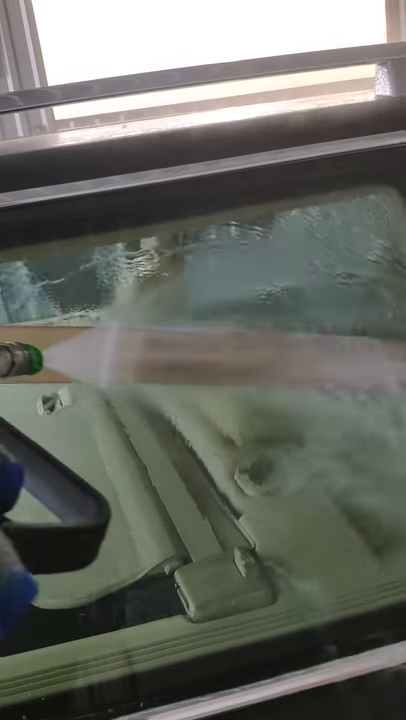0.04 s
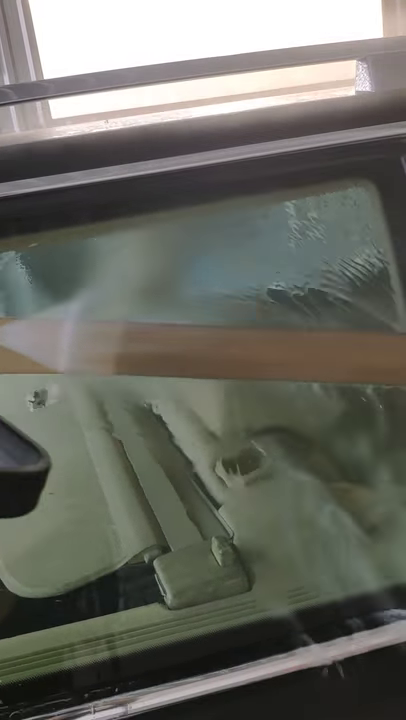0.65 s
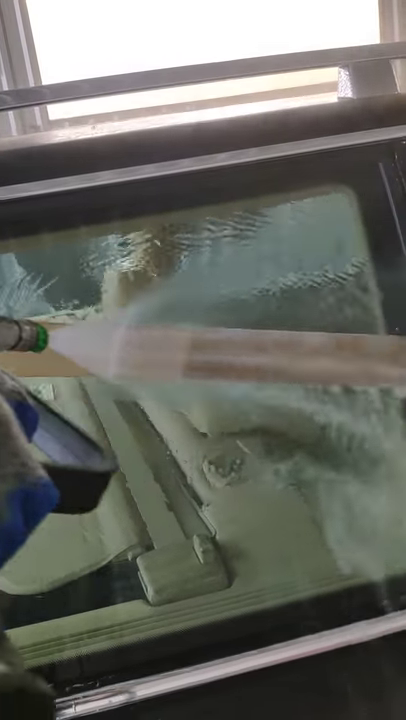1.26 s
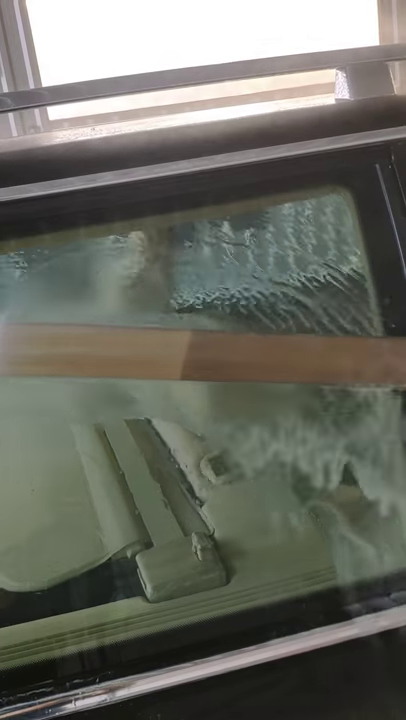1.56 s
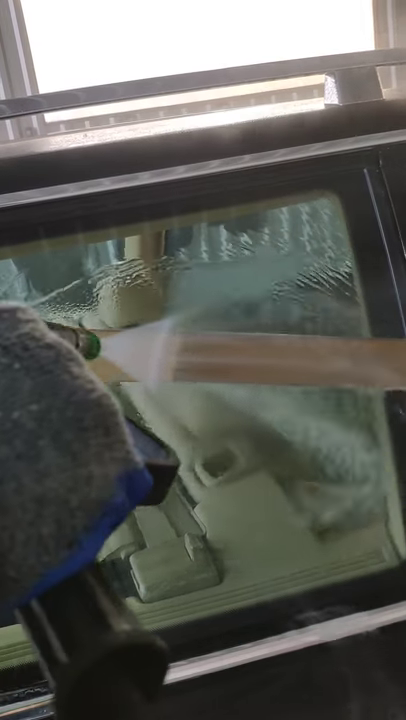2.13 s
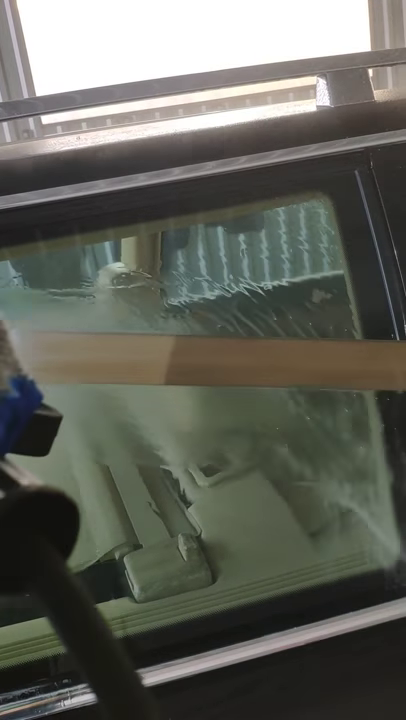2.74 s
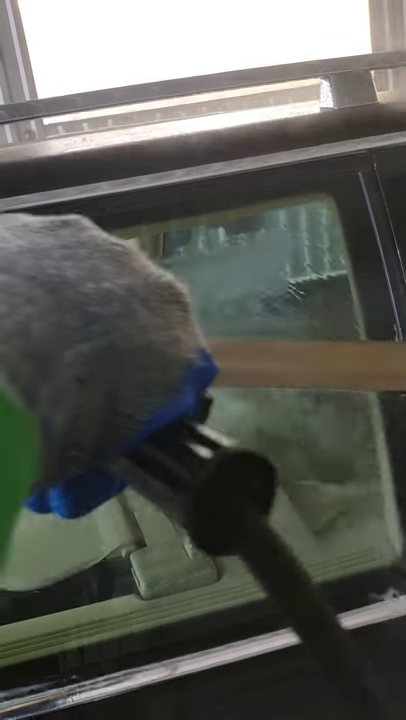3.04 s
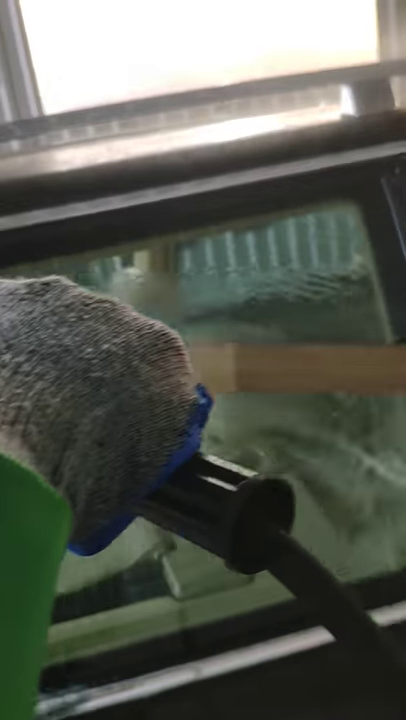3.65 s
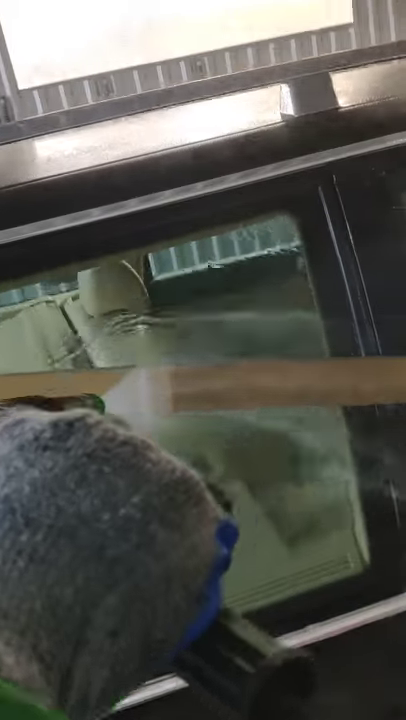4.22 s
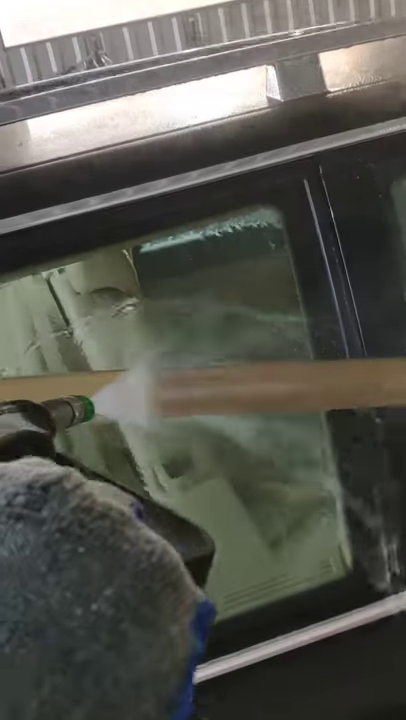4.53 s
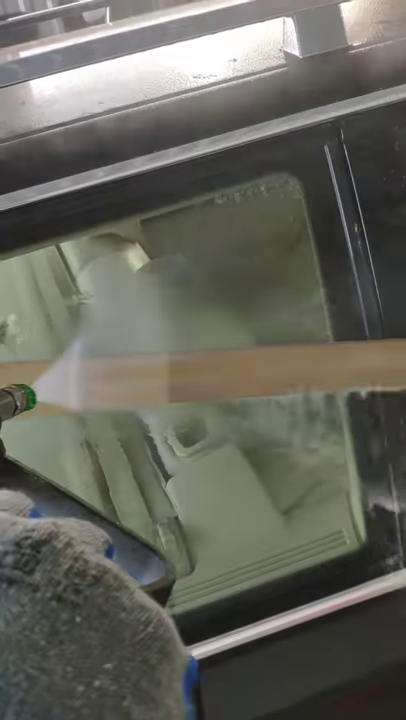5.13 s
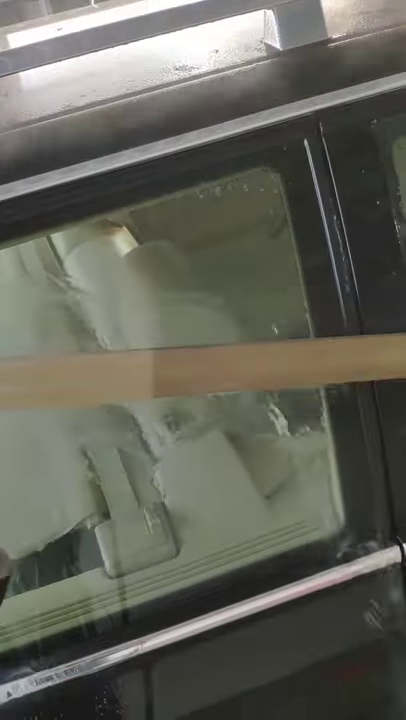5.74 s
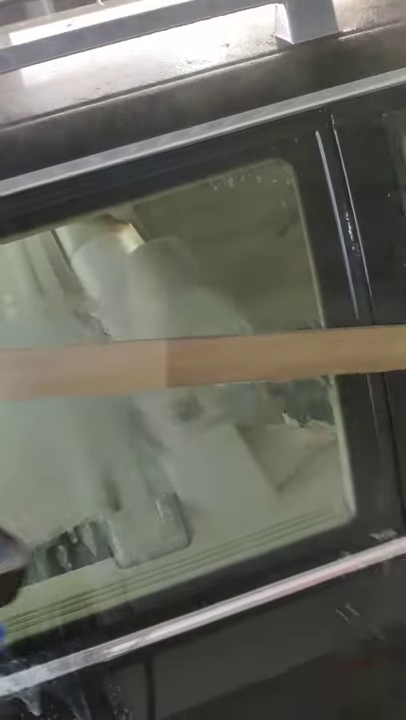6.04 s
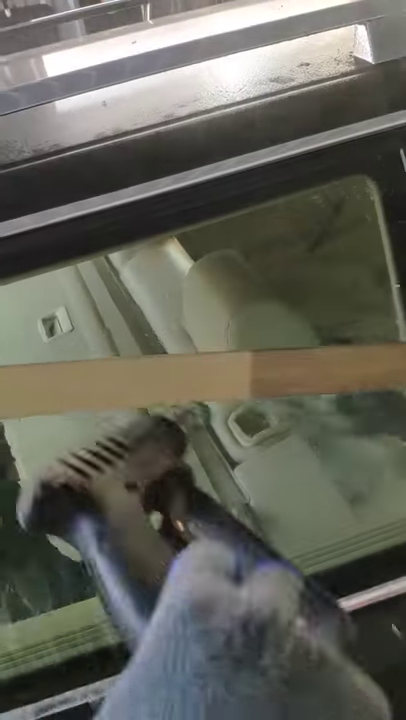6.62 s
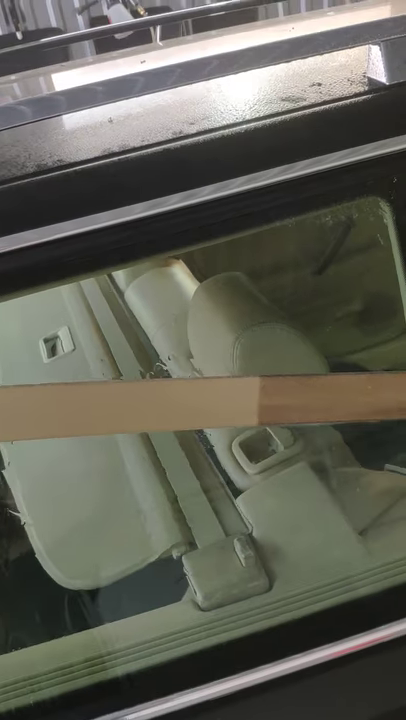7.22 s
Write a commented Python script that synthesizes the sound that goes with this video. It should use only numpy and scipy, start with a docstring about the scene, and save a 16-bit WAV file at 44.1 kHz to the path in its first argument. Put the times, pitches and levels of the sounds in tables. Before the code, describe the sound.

A pressure washer sprays a car window with a loud, bright hiss over its droning pump, then the spray stops near the end.

```python
"""A loud, bright hiss of water sweeps over a car window in a garage, heard from a phone close by.
It comes from a pressure washer, whose countless droplets burst on the glass. Across the room
its piston pump drones and clatters. Near the end the trigger is let go: the hiss stops, the valve
thumps, the pump runs free a little faster, and a few drops tick near the microphone."""
import sys
import numpy as np
from scipy import signal
from scipy.fft import rfft, irfft, next_fast_len
from scipy.io import wavfile
from scipy.ndimage import uniform_filter1d, map_coordinates

SR = 44100
rng = np.random.default_rng(int(sys.argv[2]) if len(sys.argv) > 2 else 0)


def unload_audio(sound):
    """Save the sound as a 16-bit wav file, at the path given as the first command line argument."""
    columns = np.transpose(np.atleast_2d(sound))
    # keep every value between -1 and 1, then stretch to whole-number steps
    steps = np.round(np.clip(columns, -1, 1) * 32767)
    wavfile.write(sys.argv[1], SR, steps.astype(np.int16))


N = 321048

# how hard the jet hits the glass: time_s, relative_db
JET_STRENGTH = [(0, -18.5), (1.7, -18.5), (2.8, -19.5), (3.25, -20.2), (3.75, -19.5), (4.05, -20.6),
                (4.4, -18.5), (5.2, -18.5), (5.6, -18), (6.62, -18.5)]
# where the jet lands, heard as how much sooner it reaches the left side: time_s, lead_microseconds
JET_LEFT_LEAD = [(0, 58), (2.6, 24), (3.05, -13), (4.0, 13), (4.4, 41), (6.6, 34)]
# tone of the spray: pitch_hz, relative_db
SPRAY_TONE = [(60, -14.5), (200, -14.5), (400, -12.5), (700, -5.5), (1300, -5), (2300, -2), (3100, -2.5),
              (4500, -0.5), (6000, -0.5), (9000, 0.5), (12000, 0.5), (16000, -3)]
# the splash, the low part of the hiss: time_s, boost_db
SPLASH_BOOST = [(0, -0.8), (2.4, 0.5), (3.1, 2.2), (3.85, -0.4), (4.2, 0.8), (5.2, -1.5), (5.85, 0.2),
                (6.6, .2)]
# the pump shaft's ordinary overtones: pitch_hz, level_db
PLAIN_OVERTONES = [(48, -82), (240, -85.5), (400, -63.5), (600, -70), (850, -38), (1020, -62.5),
                   (1500, -59), (1900, -54), (2150, -59.5), (2520, -60), (2650, -53.5), (2900, -76)]
# overtones that stand out (three pistons make the multiples of 3), at two places and running free:
# overtone_number, first_place_db, second_place_db, free_db
STRONG_OVERTONES = [(3, -52, -52, -72), (6, -51.5, -55.5, -59.5), (8, -63.5, -65, -61), (9, -58, -57, -63),
                    (11, -56, -53, -77), (12, -61.5, -71, -55.5), (13, -48.5, -59, -64),
                    (15, -53, -51, -54), (16, -41.5, -42.5, -61), (17, -52, -56, -60),
                    (18, -51, -53.5, -53), (19, -49.5, -67, -68), (23, -63, -62, -59),
                    (25, -56.5, -64, -58), (27, -50.5, -46.5, -61), (28, -58, -57, -53.5),
                    (31, -60, -75, -64), (32, -52, -55, -68), (34, -48, -47.5, -54), (36, -62, -54, -72),
                    (38, -60, -41, -66), (40, -49, -46.5, -70), (41, -49.5, -52, -62),
                    (42, -58.5, -54, -62), (43, -49.5, -50, -51), (47, -50, -47.5, -54),
                    (50, -51, -57, -72), (51, -61, -68, -51)]
# the motor's mains hum: pitch_hz, level_db
MAINS_HUM = [(100, -67), (300, -63.5)]
# tone of the pump's clatter: pitch_hz, relative_db
CLATTER_TONE = [(30, -8), (200, -15.5), (400, -7), (550, -7), (800, -0.5), (1100, 1.5), (1600, 0),
                (2100, 2.5), (2580, 4), (2720, -3), (2850, -7.5), (6000, -13), (16000, -48)]
# brief ringing in the clatter: middle_s, spread_s, pitch_hz, width_hz, level_db
CLATTER_RINGS = [(4.28, 0.22, 2535, 130, -40.5), (6.4, 0.15, 625, 120, -45.5)]
# thumps of the valve and of the hand on the phone: start_s, pitch_hz, level_db, rise_s, left_over_right_db
DULL_THUMPS = [(6.647, 120, -35, .016, 1), (7.005, 48, -41, .011, -14), (7.098, 56, -44, .012, -16)]
# drops near the right microphone: start_s, relative_db
NEAR_DROPS = [(6.8274, -31), (6.8414, -30), (6.8724, -30), (6.9014, -29), (6.9274, -32), (6.995, -23),
              (7.0374, -31), (7.0444, -33), (7.0953, -31), (7.2024, -35)]
# tone of the faint hiss of running water: pitch_hz, relative_db
RUNNING_WATER_TONE = [(300, -24), (2800, -4), (3400, -1.5), (4500, 3.5), (5700, -7.5), (6700, -1.5),
                      (7800, -8), (10000, -8.5), (12500, -12.5), (16000, -19)]
# air stirring at the microphones: time_s, level_db
DRAUGHT_LEVEL = [(0, -59), (4.9, -63), (6, -57), (7.28, -53.5)]
# tone of that air's rumble: pitch_hz, relative_db
DRAUGHT_TONE = [(15, 1), (35, 2), (60, -5), (90, -20), (200, -9), (500, -40), (2000, -82)]
# how long the garage's echo takes to fade by 60 dB: pitch_hz, fade_s
ECHO_FADE = [(200, 0.91), (2000, 0.37), (7000, 0.56), (12000, 0.21), (16000, 0.47)]
# how alike left and right are for sound that fills the room: pitch_hz, likeness (1 = the same)
EAR_LIKENESS = [(30, 0.056), (70, 0.21), (150, 0.96), (800, 0.62), (1400, 0.028), (2400, 0.36),
                (3200, -0.12), (4500, -0.04), (16000, 0.029)]
# ringing of the duct before the left microphone: pitch_hz, width_hz, boost_db
LEFT_DUCT = [(7730, 1030, 18), (4700, 960, 0.3), (15000, 4000, 0.9)]
# ringing of the duct before the right microphone: pitch_hz, width_hz, boost_db
RIGHT_DUCT = [(10300, 3300, 12.5), (7750, 1000, 1.6), (15000, 4000, 0.5)]

LOADED_HZ, FREE_HZ = 48.04, 49.7  # shaft turns a second, spraying and running free
MOVE_S, MOVE_LENGTH_S = 4.35, 0.76  # the phone shifts from its first place towards a second
PASS_S, PASS_WIDTH_S = 3.3, 0.28  # a gloved hand passes the right microphone


def spray():
    """Droplets burst on the glass: one bright spot within a wide wash of noise."""
    spot_share = between(0.32, 0.6, ramp(MOVE_S, MOVE_LENGTH_S))
    spot = unit(filtered(rng.standard_normal(N), lambda hz: amp(along(SPRAY_TONE, hz))))
    spot = np.array([spot, delayed(spot, curve(JET_LEFT_LEAD))])
    water = np.sqrt(spot_share) * spot + np.sqrt(1 - spot_share) * room_noise(SPRAY_TONE)
    water = patchy(water, depth_db=0.56)
    # the sheet of water tears into clumps about a millisecond long
    clumps = unit(uniform_filter1d(rng.standard_normal(N), size=40))
    return unit(water * np.exp(0.08 * clumps))


def jet(turns, splash_hz=5500, mist_hz=10800, release_s=6.642, collapse_db_per_s=760):
    """The spray, with its low splash and high mist, throbs with the pistons until the trigger is let go."""
    water = spray()
    splash = filtered(water, lambda hz: 1 / (1 + (hz / splash_hz) ** 8))
    mist = filtered(water, lambda hz: 1 - 1 / (1 + (hz / mist_hz) ** 16))
    middle = water - splash - mist
    # the mist dulls briefly, then the passing hand turns more of it to the right
    passing = bell(PASS_S, PASS_WIDTH_S)
    mist_db = 1.5 * passing - 1.5 * bell(2.7, 0.16)
    mist_pan_db = between(1.5, 2, ramp(MOVE_S, MOVE_LENGTH_S)) - 5.5 * passing
    hiss = middle + splash * amp(curve(SPLASH_BOOST)) + mist * amp(mist_db) * sides(mist_pan_db)
    collapse_db = collapse_db_per_s * np.maximum(seconds() - release_s, 0)
    flutter_db = 0.19 * wobble(16)
    throb = 1 + 0.036 * np.sin(2 * np.pi * 3 * turns)  # three piston strokes a turn
    return hiss * amp(curve(JET_STRENGTH) - 7 - collapse_db + flutter_db) * throb


def past_glove(sound, settle_s=4.15, fade_s=0.45, leave_s=6.5):
    """The nearing hand's echo sweeps a dip in the tone upward on the right; then the hand shades it."""
    left, right = sound
    delay_microseconds = 33 + 180 * np.maximum(settle_s - seconds(), 0)
    settled = ramp(settle_s + fade_s / 2, fade_s)
    echo_gain = 0.23 * ramp(PASS_S - PASS_WIDTH_S, fade_s) * (1 - settled)
    echo = echo_gain * delayed(right, delay_microseconds)
    treble = filtered(right, lambda hz: band(hz, centre_hz=12150, width_hz=1400))
    shaded = 0.35 * settled * (1 - ramp(leave_s, 0.2)) * treble
    return np.array([left, (right - shaded + echo) / np.sqrt(1 + echo_gain ** 2)])


def pump_drone(turns, load, free_drop_db=8, pan_db=-1.3):
    """The turning shaft makes a stack of overtones; standing waves in the room make each one waver."""
    strong = {round(number): levels for number, *levels in STRONG_OVERTONES}
    moved = 0.82 * ramp(MOVE_S, MOVE_LENGTH_S)  # most of the way to the second place
    drone = np.zeros((2, N))
    for number in range(2, 57):
        hz = number * LOADED_HZ
        plain_db = along(PLAIN_OVERTONES, hz)
        first, second, free = amp(strong.get(number, (plain_db, plain_db, plain_db - free_drop_db)))
        level = np.sqrt(2) * between(free, between(first, second, moved), load)
        waver = 0.21 * np.sqrt(hz / 1000)
        phase = 2 * np.pi * (number * turns + rng.random()) + waver * wobble(2.91)
        apart = rng.choice([-1, 1]) * ear_angle(hz)
        for ear, sign in enumerate((1, -1)):
            swell = np.exp(waver * (wobble(1.54) - waver))
            drone[ear] += level * swell * np.sin(phase + sign * apart)
    return drone * sides(pan_db)


def pump_whine(load):
    """The pump gives a thin, unsteady whine while it is working hard."""
    jitter = 0.87 * np.array([wobble(9.8), wobble(9)])
    return load * tone(hz=2519, db=-48, phase=jitter)


def pump_clatter(load, free_db=-40.5, loaded_db=-39):
    """The pump's moving parts rattle, a little louder under load, and ring now and then."""
    gush_db = 7.5 * bell(6.72, 0.051)  # the valve turns over
    swell_db = 2.5 * bell(3.83, 0.32)  # the phone moves past the loudest spot
    clatter = amp(between(free_db, loaded_db, load) + gush_db + swell_db) * room_noise(CLATTER_TONE)
    rattle = room_noise(CLATTER_TONE)
    for middle_s, spread_s, pitch_hz, width_hz, db in CLATTER_RINGS:
        ring = unit(filtered(rattle, lambda hz: band(hz, pitch_hz, width_hz)))
        clatter += amp(db) * bell(middle_s, spread_s) * ring
    return clatter


def motor_hum():
    """Mains power makes the motor hum steadily."""
    return sum(tone(hz, db) for hz, db in MAINS_HUM)


def thumps():
    """The valve and the hand on the phone give soft, low pushes that swell and die quickly."""
    out = np.zeros((2, N))
    for start_s, hz, db, rise_s, pan_db in DULL_THUMPS:
        age = np.maximum(seconds() - start_s, 0)
        swell = age / rise_s * np.exp((1 - (age / rise_s) ** 2) / 2)
        out += amp(db) * sides(pan_db) * swell * np.sin(2 * np.pi * hz * age)
    return out


def drops(fade_s=0.0054, centre_hz=10000, pan_db=-14, count=900):
    """Single drops tick close by on the right, among a fine random patter."""
    age = np.arange(SR // 50) / SR
    patter = [(when * N / SR, -42 - 10 * softness) for when, softness in rng.random((count, 2))]
    ticks = np.zeros(N + SR)
    for start_s, db in list(NEAR_DROPS) + patter:
        tick = rng.standard_normal(len(age)) * amp(-60 * age / fade_s)
        ticks[round(start_s * SR):][:len(age)] += amp(db - 4.5) * tick / np.abs(tick).max()
    return filtered(ticks[:N], lambda hz: 1 / (1 + (2 * (hz / centre_hz - 1)) ** 2)) * sides(pan_db)


def running_water(level_db=-42.5):
    """Running water hisses faintly all around."""
    return amp(level_db) * room_noise(RUNNING_WATER_TONE)


def draught(puff_db=3.5):
    """Stirred air rumbles at the microphones in uneven puffs, more towards the end."""
    return amp(curve(DRAUGHT_LEVEL) + puff_db * wobble(6)) * room_noise(DRAUGHT_TONE)


def garage_echo(sound, pieces=16):
    """Hard walls answer, low notes longest; each piece gets its own echo, as the spray gun moves."""
    out = np.zeros((2, N + SR))
    step = N // pieces + 1
    for start in range(0, N, step):
        hz, age, noise = signal.stft(rng.standard_normal((2, SR // 2)), SR, nperseg=256)
        fade = amp(-60 * age / along(ECHO_FADE, hz)[:, None])
        tail = signal.istft(noise * fade, SR, nperseg=256)[1]
        echo = signal.fftconvolve(sound[:, start:start + step], tail / np.linalg.norm(tail[0]), axes=1)
        out[:, start:start + echo.shape[1]] += echo
    return out[:, :N]


def duct(rings, hz):
    """The narrow duct before a microphone rings in the treble."""
    gain = 1
    for pitch_hz, width_hz, db in rings:
        damping = 1j * hz * width_hz
        gain = gain * (1 + (amp(db) - 1) * damping / (pitch_hz ** 2 - hz ** 2 + damping))
    return gain


def room_noise(colour):
    """Stereo noise of strength 1 that arrives from all sides."""
    def response(hz):
        angle = ear_angle(hz)
        return amp(along(colour, hz)) * [np.cos(angle), np.sin(angle)]
    shared, opposite = filtered(rng.standard_normal((2, N)), response)
    return unit(np.array([shared + opposite, shared - opposite]))


def ear_angle(hz):
    """An angle that grows as left and right become less alike."""
    return np.arccos(np.clip(along(EAR_LIKENESS, hz), -1, 1)) / 2


def patchy(sound, depth_db):
    """Add random swells, each over a patch of nearby pitches and some tens of milliseconds."""
    grid = signal.stft(sound, nperseg=256)[2]
    swells = uniform_filter1d(rng.standard_normal(grid.shape[1:]), size=10, axis=0)
    swells = uniform_filter1d(swells, size=16, axis=1)
    return signal.istft(grid * amp(depth_db * unit(swells)), nperseg=256)[1][..., :N]


def filtered(sound, response):
    """Turn each pitch up or down by response(hz)."""
    size = next_fast_len(N + SR // 4, True)
    return irfft(rfft(sound, size) * response(np.fft.rfftfreq(size, 1 / SR)), size)[..., :N]


def delayed(sound, microseconds):
    """Make a sound late by a changing time."""
    return map_coordinates(sound, [np.arange(N) - microseconds * SR / 1e6], order=5)


def tone(hz, db, phase=0):
    """A pure note with an average level of db."""
    return np.sqrt(2) * amp(db) * np.sin(2 * np.pi * hz * seconds() + phase)


def wobble(per_s):
    """A smooth curve through per_s random values a second."""
    coarse = np.linspace(0, N, 2048)
    smooth = map_coordinates(rng.standard_normal(1024), [coarse * per_s / SR], mode="wrap")
    return np.interp(np.arange(N), coarse, smooth)


def ramp(middle_s, length_s):
    """A smooth step from 0 to 1."""
    progress = np.clip((seconds() - middle_s) / length_s, -0.5, 0.5)
    return (1 + np.sin(np.pi * progress)) / 2


def bell(middle_s, width_s):
    """A smooth swell from 0 to 1 and back."""
    return np.exp(-((seconds() - middle_s) / width_s) ** 2 / 2)


def band(hz, centre_hz, width_hz):
    """A bell-shaped band of pitches."""
    return np.exp(-np.log(2) * (2 * (hz - centre_hz) / width_hz) ** 2)


def along(table, hz):
    """Look up a pitch in a table, sliding between its rows."""
    pitches, values = np.transpose(table)
    return np.interp(np.log(hz + 1), np.log(pitches + 1), values)


def curve(table):
    """Join a table's timed values into one value per sample."""
    return np.interp(seconds(), *np.transpose(table))


def between(first, second, share):
    """From the first value to the second as share goes from 0 to 1."""
    return first + share * (second - first)


def sides(db):
    """Left and right gains, the left louder by db."""
    return amp(np.array([np.atleast_1d(db), -np.atleast_1d(db)]) / 2)


def amp(db):
    """Decibels to gain."""
    return 10 ** (np.asarray(db) / 20)


def unit(sound):
    """Scale to an average strength (rms) of 1."""
    return sound / np.sqrt(np.mean(sound ** 2) + 1e-20)


def seconds():
    """The time of every sample."""
    return np.arange(N) / SR


def scene(echo_db=-7):
    """The jet and its echo, the pump, running water, stirred air, drops and thumps."""
    load = 1 - ramp(6.75, 0.3)  # the valve takes the load away, so the motor speeds up
    turns = np.cumsum(between(FREE_HZ, LOADED_HZ, load)) / SR
    hiss = jet(turns)
    pump = pump_drone(turns, load) + pump_whine(load) + pump_clatter(load) + motor_hum()
    background = running_water() + draught()
    return past_glove(hiss) + amp(echo_db) * garage_echo(hiss) + pump + background + drops() + thumps()


def record(dry, top_hz=15780):
    """Each microphone's duct colours its side; the phone keeps nothing above top_hz."""
    return filtered(dry, lambda hz: np.array([duct(LEFT_DUCT, hz), duct(RIGHT_DUCT, hz)]) * (hz < top_hz))


dry = scene()
out = record(dry)
unload_audio(out)
```